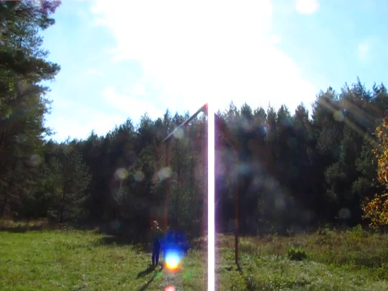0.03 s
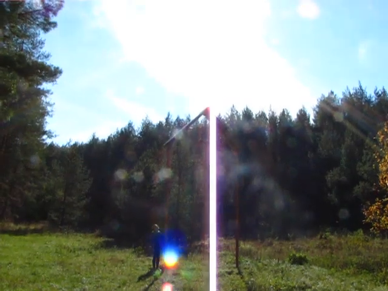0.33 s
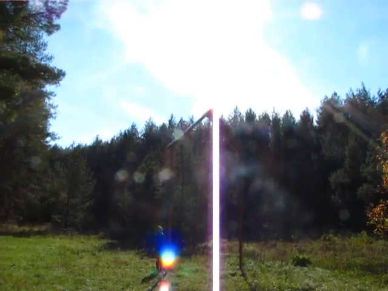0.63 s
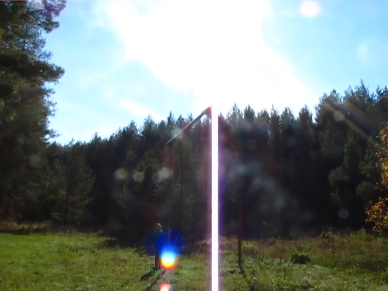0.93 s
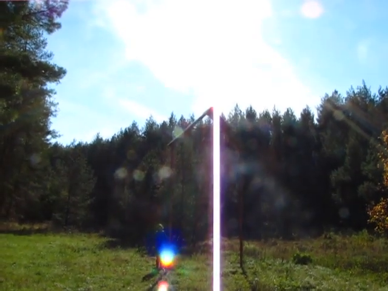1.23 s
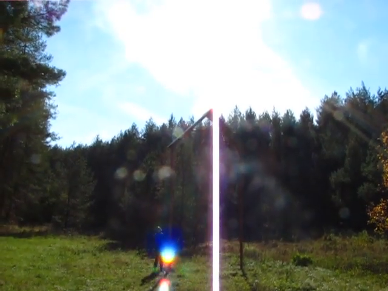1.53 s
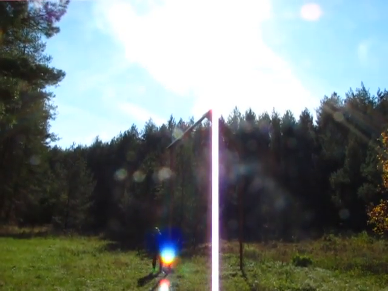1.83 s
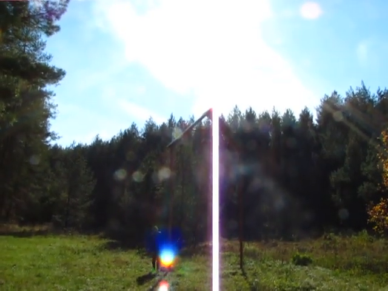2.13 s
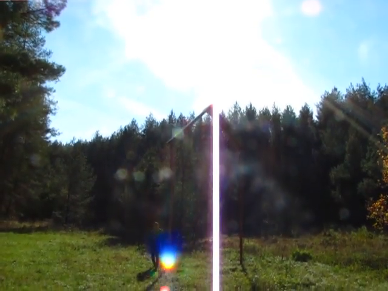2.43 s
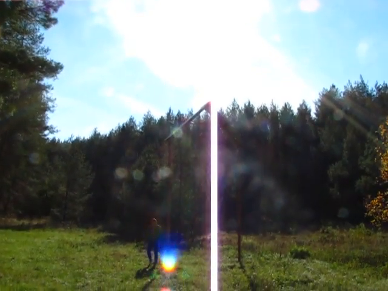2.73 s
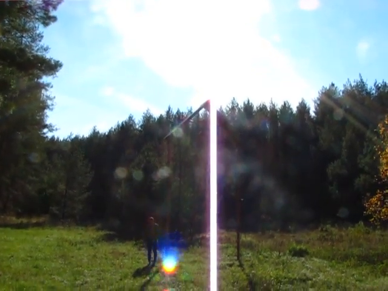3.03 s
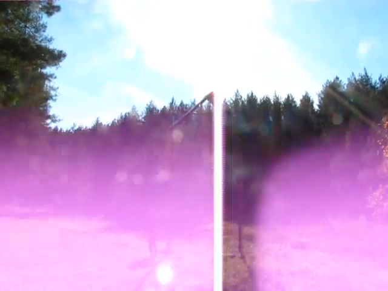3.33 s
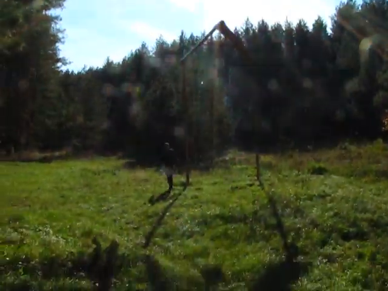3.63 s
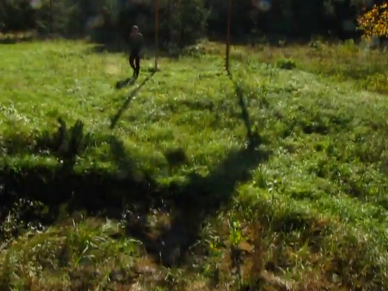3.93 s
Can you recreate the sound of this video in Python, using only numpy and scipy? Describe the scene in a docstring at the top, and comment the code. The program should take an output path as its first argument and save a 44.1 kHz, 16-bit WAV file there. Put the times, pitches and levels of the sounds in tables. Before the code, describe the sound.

A bell is struck once in a forest clearing, just after wind starts buffeting the microphone. Its bright overtones fade quickly while lower tones ring on, one pulsing, over weakening gusts, soft hiss and a small handling tick.

```python
"""Wind buffets the microphone over an outdoor hiss. Half a second in, a bell is struck once in a forest
clearing. The clapper clangs and sets the metal vibrating at many pitches: the bright overtones fade quickly,
while three low tones sing on, one of them pulsing. A faint touch on the bell comes just before the blow, and
there are a few soft rustles, a faint squeak as the bell swings and a handling tick. A limiter turns the volume
down at the loudest peaks, such as the hardest puffs of wind."""
import sys
import numpy as np
from scipy import signal
from scipy.fft import rfft, irfft
from scipy.io import wavfile

SR = 44100
rng = np.random.default_rng(int(sys.argv[2]) if len(sys.argv) > 2 else 0)


def dump(signal):
    """Clip the signal to [-1, 1] and save it as 16-bit WAV at the path in sys.argv[1]."""
    limited = np.clip(np.atleast_2d(signal).T, -1, 1)
    pcm = np.round(limited * 32767).astype(np.int16)
    wavfile.write(sys.argv[1], SR, pcm)


N = 176400
T = np.arange(N) / SR
STRIKE_S = .5358
AGE = np.maximum(T - STRIKE_S, 0)  # seconds since the blow
CUTOFF_HZ = 6546  # treble above this is filtered away

# The bell's high tones, each with a weaker twin close in pitch. Each row: pitch in Hz, relative level
# in dB, seconds to fade by 60 dB, twin's offset in Hz, twin's offset in dB, extra dB at the blow.
OVERTONES = [(1563, -31.3, 3.15, 2.9, -18, -6), (1731, -29.0, 0.56, 4.1, -7, -14),
             (1856, -17.1, 1.63, -1.1, -8, -14), (2444, -35.3, 1.99, 3.3, -13, -11),
             (2524, -38.3, 1.89, 8.3, -7, 1), (2557, -22.1, 1.91, -9.1, -23, -14),
             (2665, -33.6, 1.19, 2.6, -8, 1), (2838, -28.4, 2.03, 1.4, -9, 0),
             (2875, -35.0, 0.69, 2.7, -7, -14), (3263, -38.7, 1.02, -1.9, -11, 6),
             (3838, -40.9, 1.04, 4.2, -11, -5), (3950, -27.6, 2.06, -1.0, -16, -6),
             (4030, -48.1, 0.49, 3.5, -3, 6), (4421, -39.9, 0.84, 4.2, -7, -14),
             (4654, -49.5, 1.12, 11.5, -3, -1), (5152, -45.8, 2.54, 1.5, -8, -13),
             (5195, -47.4, 0.99, 2.4, -10, -14), (5873, -53.5, 2.56, 1.5, -8, -13)]


def from_db(db):
    """Turn decibels into a factor to multiply a sound by."""
    return 10 ** (np.asarray(db) / 20)


def unit_level(x):
    """Scale a signal so that its average strength (rms) is 1."""
    return x / np.sqrt(np.mean(x ** 2) + 1e-20)


def level(rows):
    """A volume curve drawn through points of time in seconds and level in dB."""
    return from_db(np.interp(T, *np.transpose(rows)))


def noise(spectrum):
    """Noise of strength 1, its tone shaped by points of frequency in Hz and relative level in dB."""
    hz, db = np.transpose(spectrum)
    log_hz = np.log(np.fft.rfftfreq(N, 1 / SR) + 1)
    gain = from_db(np.interp(log_hz, np.log(hz), db, left=-90, right=-90))
    return unit_level(irfft(rfft(rng.standard_normal(N)) * gain, N))


def drift(rate_hz):
    """A random wobble of strength 1 that seldom moves faster than the given rate."""
    hz = np.fft.rfftfreq(N, 1 / SR)
    keep_slow = (hz > 0) / (1 + (hz / rate_hz) ** 4)
    return unit_level(irfft(rfft(rng.standard_normal(N)) * keep_slow, N))


def bell_tone(hz, age=AGE, attack_s=.0009):
    """One pure vibration of the bell, rising quickly from the moment of contact."""
    return np.sin(2 * np.pi * hz * age) * (1 - np.exp(-age / attack_s))


def outdoor_hiss():
    """The soft hiss of the clearing, a little louder towards the end."""
    # Each row: frequency in Hz, relative level of the hiss in dB.
    spectrum = [(25, 0), (100, -1), (300, 2), (600, 4.5), (1000, -3.5), (1600, -3.5), (2300, -11),
                (3800, -14.5), (5300, -19), (6200, -31.5), (7000, -47)]
    # Each row: time in seconds, level of the hiss in dB.
    loudness = [(0, -40), (.5, -41.5), (.7, -42), (1.6, -41.5), (2.4, -39.5), (3.2, -38), (3.5, -39),
                (4, -35.5)]
    return level(loudness) * noise(spectrum)


def wind():
    """Swirling air rumbles on the microphone; its brighter edge flares with each swirl."""
    # Each row: frequency in Hz, relative level of the wind in dB.
    spectrum = [(20, -12), (55, 2.5), (120, 0.5), (250, -3.5), (400, -13), (700, -28), (1200, -38.5),
                (3000, -46), (6000, -59)]
    # Each row: time in seconds, relative strength of the gusts in dB.
    gusts = [(0, -22.5), (.16, -21), (.27, -24), (.33, -20.5), (.53, -22), (.56, -30), (.7, -34),
             (.91, -22.5), (.98, -32), (1.04, -19), (1.09, -30.5), (1.35, -24), (1.40, -37), (1.46, -28),
             (1.68, -41), (1.89, -21), (1.955, -47.5), (2.01, -25.5), (2.13, -39), (2.38, -33.5),
             (2.42, -20), (2.48, -35), (2.59, -30), (2.68, -36.5), (2.82, -29), (2.91, -48.5), (3.09, -31),
             (3.33, -50), (4, -56.5)]
    flow, gust = noise(spectrum), level(gusts)
    swirls = np.minimum(drift(rate_hz=40), 2)
    split_hz, strong_gust_db = 210, -22
    rumble = signal.sosfiltfilt(signal.butter(2, split_hz, fs=SR, output="sos"), flow)
    edge = (flow - rumble) * (gust / from_db(strong_gust_db)) ** .56  # weaker gusts sound duller
    buffeting = rumble * from_db(3 * swirls) + edge * from_db(4.5 * swirls)
    return from_db(-1) * gust * unit_level(buffeting)


def puffs():
    """A swirl hits the microphone: one pressure swing, a rebound on either side and a brief flutter."""
    # Each row is one hard puff: time in seconds, peak level of the swing in dB, its width in seconds.
    hits = [(0.064, -9, 0.0023), (.135, -16, 0.0022), (0.15, -10, .0015), (.165, -13.5, 0.0026),
            (0.215, -13, .0025), (0.312, -7, 0.00098), (0.317, -7.5, 0.00089), (0.341, -10.5, 0.00063),
            (0.374, -11.5, 0.00094), (0.429, -10.5, 0.0016), (.446, -18, 0.002), (0.477, -15, .0014),
            (.914, -12, 0.001), (1.034, -7.5, 0.0011), (1.137, -14, .0016), (1.361, -14, 0.0011),
            (1.44, -16, 0.0013), (1.908, -13, 0.0016), (2.183, -17, .002), (2.424, -18.5, 0.0026),
            (2.503, -17.5, 0.0017), (2.776, -19, 0.0019), (3.246, -12.5, .002)]
    # Each row: frequency in Hz, relative level of the flutter in dB.
    spectrum = [(150, -7), (350, 3.5), (700, -4), (1300, -21), (2200, -32.5), (6000, -53.5)]
    flutter, flutter_s = from_db(-11.5) * noise(spectrum), .0021
    out = np.zeros(N)
    for time_s, db, width_s in hits:
        near = np.abs(T - time_s) < .03
        t = T[near] - time_s
        swing = (1 - (t / width_s) ** 2) * np.exp(-(t / width_s) ** 2 / 2)
        burst = flutter[near] * np.exp(-(t / flutter_s) ** 2)
        out[near] += from_db(db) * (rng.choice([-1, 1]) * swing + burst)
    return out


def rustles(top_hz=5460):
    """Brief brushing sounds close to the microphone, and one faint squeak as the bell swings, each a swell of
    noise around one pitch."""
    # Each row: time in seconds, level in dB, half length in seconds, centre in Hz, width in octaves.
    brushes = [(.33, -43.5, 0.022, 2590, 0.51), (0.516, -47, 0.02, 4400, 0.063),
               (2.58, -43, .018, 3630, .55), (3.081, -36, 0.014, 1500, 0.77),
               (3.896, -33.5, 0.018, 3720, .46)]
    out, hz = 0, np.geomspace(100, CUTOFF_HZ, 40)
    for time_s, db, half_s, centre_hz, octaves in brushes:
        band_db = -20 * np.log10(1 + (np.log2(hz / centre_hz) / octaves) ** 2 / 2)
        swell = 1 / (1 + ((T - time_s) / half_s) ** 2 / 2) ** 2
        out = out + from_db(db) * noise(np.c_[hz, band_db]) * swell
    return signal.sosfilt(signal.butter(6, top_hz, fs=SR, output="sos"), out)


def handling_tick(start_s=3.076):
    """The case around the microphone clicks once under the fingers."""
    # Each row is one tone of the case: pitch in Hz, level in dB, seconds to fade by 60 dB.
    tones = [(1460, -45, .05), (2586, -32.5, 0.094), (4950, -35, .06)]
    age = np.maximum(T - start_s, 0)
    return sum(np.sin(2 * np.pi * hz * age) * from_db(db - 60 * age / fade_s) for hz, db, fade_s in tones)


def light_touch(start_s=.315, centre_hz=3270):
    """A light touch just before the blow wakes only the bell's overtones near one pitch."""
    out, age = 0, np.maximum(T - start_s, 0)
    for hz, db, fade_s, *_ in OVERTONES:
        touch_db = -10 - 6 * abs(hz - centre_hz) / 200  # 6 dB weaker for every 200 Hz off centre
        out = out + bell_tone(hz, age) * from_db(db + touch_db - 60 * age / fade_s)
    return out


def clapper_clang(crash_s=.11, echo_s=.6):
    """The clapper hits with a short crash, and the trees scatter back a softer, longer echo."""
    # Each row: frequency in Hz, relative level of the clang in dB.
    spectrum = [(100, -4), (450, 0), (800, -3), (1300, -1.5), (1800, -1), (2250, -3), (2800, 5),
                (4300, -10.5), (5500, -18), (7000, -32)]
    crash = from_db(-20.5 - 60 * AGE / crash_s) * noise(spectrum)
    echo = from_db(-34.5 - 60 * AGE / echo_s) * noise(spectrum)
    return (crash + echo) * (T > STRIKE_S)


def bright_overtones(settle_s=.063):
    """The bell's high tones shimmer and die away, each pulsing as it slips out of step with its twin."""
    waver_db, shimmer_db = 1.1, 2.5 * np.exp(-AGE / .25)  # the shimmer soon calms down
    out = 0
    for k, (hz, db, fade_s, twin_offset_hz, twin_db, early_db) in enumerate(OVERTONES):
        pair = bell_tone(hz) + from_db(twin_db) * bell_tone(hz + twin_offset_hz)
        fade_db = -60 * AGE / fade_s
        settle_db = early_db * np.exp(-AGE / settle_s)
        wobble_db = waver_db * drift(rate_hz=7.8) + shimmer_db * drift(rate_hz=31)
        direction = (-1) ** k  # neighbouring pairs start by swinging opposite ways
        out = out + direction * pair * from_db(db + fade_db + settle_db + wobble_db)
    return from_db(.5) * out


def low_tones():
    """The bell's three lasting vibrations, called hum, prime and tierce, carry the long ring."""
    # One table for each tone. Each row: time in seconds, level at the microphone in dB.
    hum_level = [(.54, -34), (.68, -31.5), (.82, -27.5), (1.3, -24.5), (1.95, -23.5), (2.5, -20.5),
                 (3.35, -19.5), (3.52, -15.5), (3.68, -16), (3.84, -12.5), (4, -16)]
    prime_level = [(.54, -22.5), (.7, -23.5), (.9, -20.5), (1.7, -20), (2.35, -19.5), (2.6, -22),
                   (3.1, -21), (3.85, -23.5), (4, -26.5)]
    tierce_level = [(.54, -21.5), (.8, -18.5), (1.35, -17.5), (1.7, -17), (2.3, -19), (2.9, -22),
                    (3.22, -22.5), (3.3, -27.5), (3.5, -25.5), (3.67, -32.5), (3.77, -45), (3.9, -35.5),
                    (4, -36)]
    hum, tierce = bell_tone(hz=470.07), bell_tone(hz=1060.22)
    # A weaker twin makes the prime pulse about nine times a second.
    prime = bell_tone(hz=836.43) + from_db(-11) * bell_tone(hz=827.56)
    return level(hum_level) * hum - level(prime_level) * prime + level(tierce_level) * tierce


def scene():
    """Mix the bell, the wind, the small noises and the hiss into one channel."""
    bell = light_touch() + low_tones() + bright_overtones() + clapper_clang()
    return (bell + wind() + puffs() + rustles() + handling_tick() + outdoor_hiss())[None]


def record(dry):
    """A limiter lowers the volume just ahead of loud peaks and recovers slowly; high treble is cut."""
    ceiling_db, recovery_db_per_s, attack_s, look_ahead_s = -8, 41.5, .0008, .00056
    excess_db = np.maximum(20 * np.log10(np.abs(dry[0]) + 1e-9) - ceiling_db, 0)
    recovery_db = recovery_db_per_s * T
    held_db = np.maximum.accumulate(excess_db + recovery_db) - recovery_db
    smoothing = np.exp(-1 / (attack_s * SR))
    smooth_db = signal.lfilter([1 - smoothing], [1, -smoothing], held_db)
    dip_db = np.interp(T + look_ahead_s, T, smooth_db)
    treble_cut = signal.butter(18, CUTOFF_HZ, fs=SR, output="sos")
    return signal.sosfilt(treble_cut, dry * from_db(-dip_db))


dry = scene()
out = record(dry)
dump(out)
```